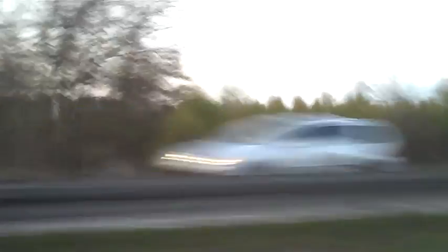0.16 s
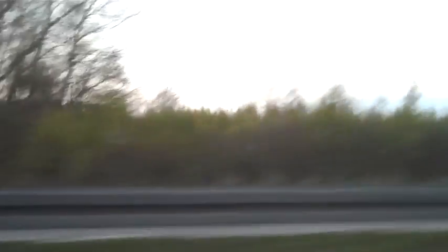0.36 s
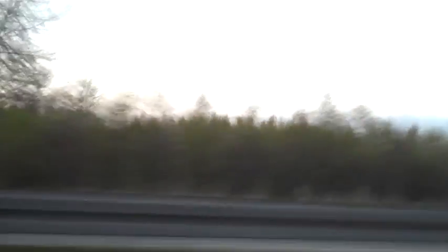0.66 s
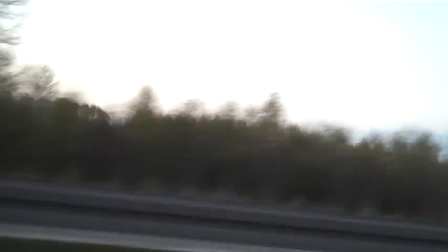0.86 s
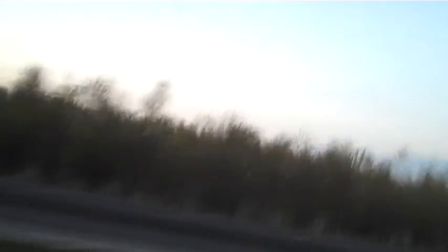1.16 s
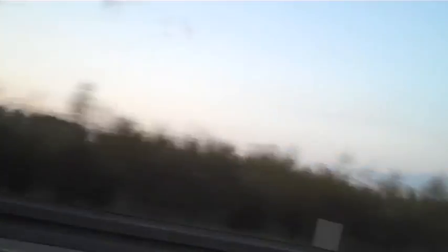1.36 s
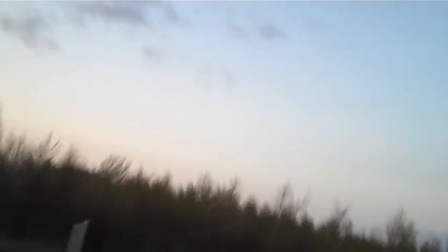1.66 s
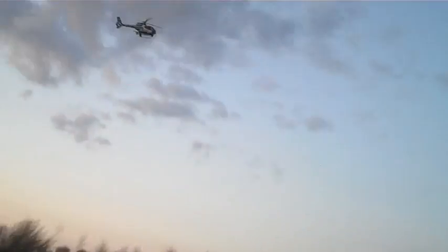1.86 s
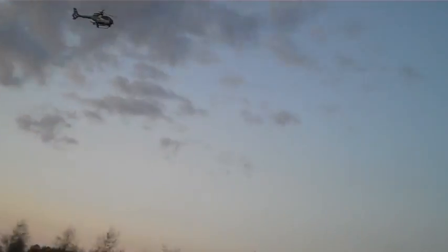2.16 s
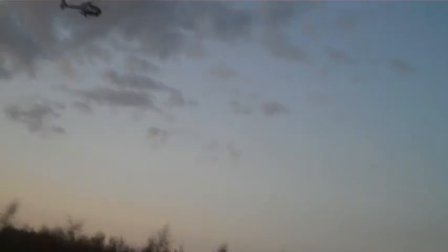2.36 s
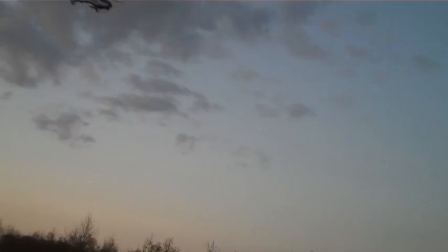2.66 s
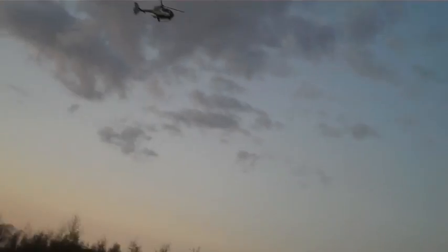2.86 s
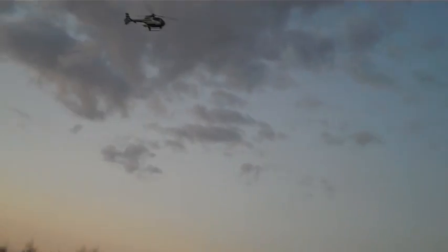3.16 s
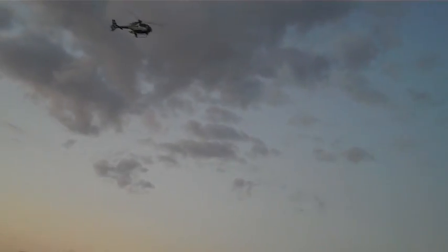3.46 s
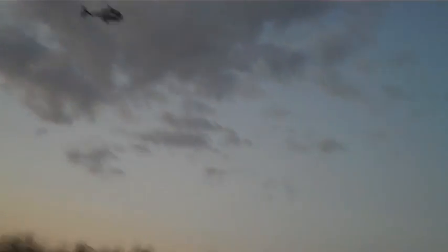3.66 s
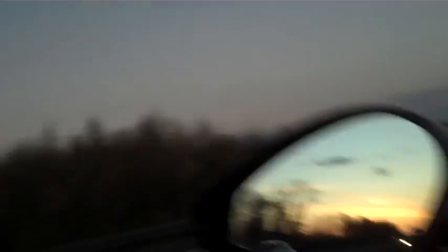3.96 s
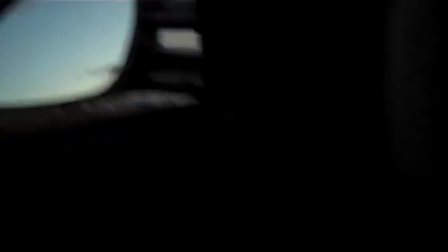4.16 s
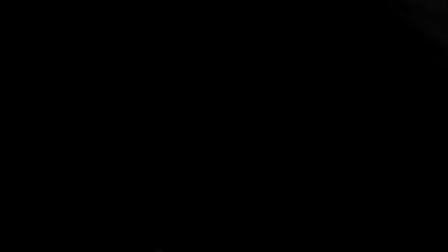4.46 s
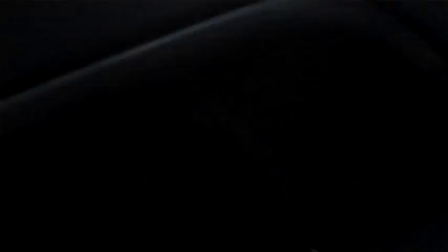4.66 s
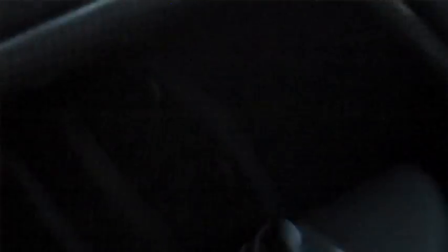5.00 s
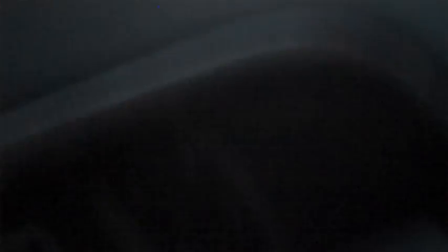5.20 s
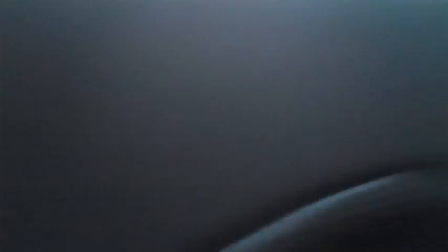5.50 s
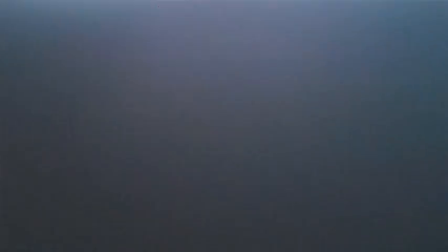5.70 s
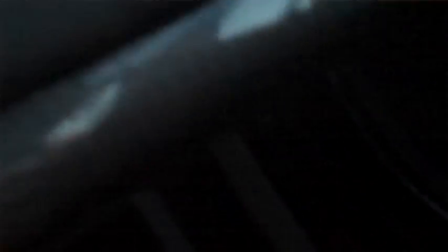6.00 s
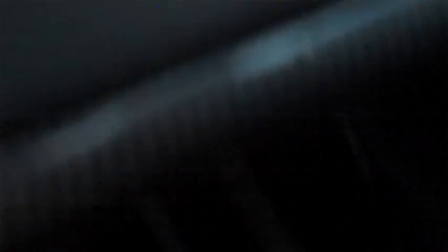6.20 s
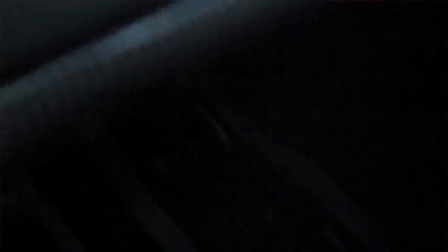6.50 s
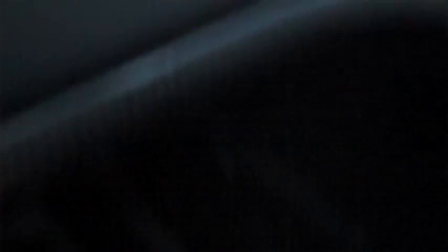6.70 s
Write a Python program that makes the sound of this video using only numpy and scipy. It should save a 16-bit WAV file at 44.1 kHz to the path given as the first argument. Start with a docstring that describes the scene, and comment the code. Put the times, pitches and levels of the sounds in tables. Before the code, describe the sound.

At the open window of a fast car, turbulent air slams the microphone with dense thumps, slaps and distorted crackles, easing into scattered pops and soft blows. At about four seconds the wind vanishes. Inside the cabin, a faint tyre wash remains, then a smooth six-cylinder engine swells, climbing in pitch and brightening steadily to the end.

```python
"""A microphone at the open window of a fast car: eddies slam into it as knots of pressure kinks that thump,
slap and crackle, tight vortices pop and knock, and shaped noise rumbles, flutters and hisses between them.
After four seconds the microphone is drawn inside and the buffeting stops, leaving a steady wash of tyre noise.
The six-cylinder engine then pulls up through its revs: sine lines on its cycle rate and pulsing, echoed noise
swell and brighten over the road. The loudest peaks flatten against the microphone's limit."""
import sys
import numpy as np
from scipy import signal
from scipy.fft import rfft, irfft, next_fast_len
from scipy.io import wavfile
from scipy.ndimage import uniform_filter1d

SR = 44100
rng = np.random.default_rng(int(sys.argv[2]) if len(sys.argv) > 2 else 0)


def transcribe(u):
    """Save the signal u as a 16-bit wav file named by the first command-line argument.

    u: samples, shape (n,) or (channels, n), limited to [-1, 1]; the rate is SR.
    q: integer samples, one column per channel.
    """
    v = np.clip(np.atleast_2d(u).T, -1, 1)
    q = np.round(v * 32767).astype(np.int16)
    wavfile.write(sys.argv[1], SR, q)


N = 301644
TIME = np.arange(N) / SR


def amp(db):
    """Decibels to gain."""
    return 10 ** (np.asarray(db) / 20)


def unit(x):
    """Scales to rms 1."""
    return x / np.sqrt(np.mean(x ** 2) + 1e-20)


def follow(rows):
    """Each column of a curve table, drawn as straight lines over the whole scene."""
    seconds, *columns = np.transpose(rows)
    return [np.interp(TIME, seconds, column) for column in columns]


def lift(hz, peaks):
    """The dB that resonances and hollows add at a frequency."""
    return sum(db / (1 + (2 * (hz - centre) / width) ** 2) for centre, width, db in peaks)


def colour(x, spectrum, peaks=()):
    """Filters x by a spectrum with resonances on top; rms 1."""
    size = next_fast_len(len(x))
    hz = np.fft.rfftfreq(size, 1 / SR)
    corner_hz, corner_db = np.transpose(spectrum)
    octaves = np.log2(hz + 1)
    corners = np.log2(corner_hz)
    # past either end of the spectrum the level falls 20 dB an octave
    outside = abs(octaves - np.clip(octaves, corners[0], corners[-1]))
    level = np.interp(octaves, corners, corner_db) - 20 * outside + lift(hz, peaks)
    filtered = irfft(rfft(x, size) * amp(level), size)
    return unit(filtered[:len(x)])


def noise():
    """White noise as long as the scene."""
    return rng.standard_normal(N)


def wander(rate_hz):
    """Smooth chance of rms 1, up to about the given rate."""
    hz = np.fft.rfftfreq(N, 1 / SR)
    return unit(irfft(rfft(noise()) * np.exp(-(hz / rate_hz) ** 2), N))


def scatter(shape):
    """Even chance between -1 and 1."""
    return rng.uniform(-1, 1, shape)


def swell(t, rise_s, fall_s):
    """A bell around t = 0 with its own rise and fall."""
    return np.exp(-.5 * (t / np.where(t < 0, rise_s, fall_s)) ** 2)


def add(mix, s, sound):
    """Adds a sound centred on the time s."""
    start = round(s * SR) - len(sound) // 2
    sound = sound[max(-start, 0):]
    part = mix[max(start, 0):][:len(sound)]
    part += sound[:len(part)]


# Strength of the airstream over the microphone. Each row: time in seconds, strength in dB.
AIRFLOW = [(0, -14.5), (.36, -21), (.85, -26), (1.35, -31), (2.1, -32.5), (2.95, -30.5), (3.4, -37),
           (3.9, -36)]
STREAM_DB = -30  # an ordinary airstream
# How much wind still reaches the microphone. Each row: time in seconds, gain in dB before each layer's own factor.
SHELTER = [(0, -3.5), (3.85, -2), (3.98, -5.5), (4.03, -19), (4.2, -32), (4.5, -62)]
# Surge and slack of the rumble. Each row: time in seconds, relative level in dB.
GUSTS = [(0.0, -26), (0.13, -24), (0.15, -16.5), (0.49, -29), (0.99, -23.5), (1.14, -31), (1.81, -27.5),
         (1.89, -39), (2.02, -23), (2.06, -29), (2.4, -28), (2.44, -30.5), (2.87, -25.5), (3.0, -30.5),
         (3.58, -29), (3.9, -33), (3.93, -42), (3.975, -24)]
# Tone of the wind's three layers. Each row: frequency in Hz, relative density in dB per Hz.
RUMBLE = [(15, -36), (30, -21), (60, -3.5), (100, 1.5), (150, -3.5), (220, -14.5), (320, -29), (600, -42)]
FLUTTER = [(100, -2), (220, 7.5), (400, -4), (700, -8.5), (1100, -13), (1800, -30), (2600, -36.5),
           (5000, -56.5)]
HISS = [(900, -1), (1800, 11.5), (2700, 5), (4000, -0.5), (7000, -10), (10000, -25.5), (14000, -34)]


def wind(rumble_db=4.5, flutter_db=-28.5, hiss_db=-58.5, lumps_db=2, flutter_depth_db=3.5, eddy_hz=45,
         hiss_growth=1.29, rumble_shelter=1.95, hiss_shelter=0.34, tearing=0.15):
    """Turbulent air rumbles, flutters and hisses; shelter stops the rumble first and the hiss last."""
    stream = follow(AIRFLOW)[0] - STREAM_DB
    shelter = follow(SHELTER)[0]
    eddies = wander(eddy_hz)

    low = colour(noise(), RUMBLE)
    low /= np.sqrt(uniform_filter1d(low ** 2, size=3500) + 1e-6)  # a steady stream feeds the rumble evenly
    lumpy = unit(low * amp(lumps_db * eddies))
    rumble = amp(rumble_db + follow(GUSTS)[0] + rumble_shelter * shelter) * lumpy

    fluttering = noise() * amp(flutter_depth_db * eddies)
    flutter = amp(flutter_db + stream + shelter) * colour(fluttering, FLUTTER)

    tear = tearing * np.maximum(stream, 0) * eddies  # a strong stream tears the hiss into shreds
    hiss_level = hiss_db + hiss_growth * stream + tear + hiss_shelter * shelter
    return rumble + flutter + amp(hiss_level) * colour(noise(), HISS)


# Tone of the tyres. Each row: frequency in Hz, relative density in dB per Hz.
TYRES = [(25, 4), (110, -12.5), (300, -24), (430, 0), (700, 1), (950, -2), (1200, -10), (1550, -2.5),
         (1950, -9.5), (2200, -16), (4000, -23.5), (8000, -36)]


def road(tyres_db=-52):
    """The steady wash of the tyres: noise through a fixed spectrum."""
    return amp(tyres_db) * colour(noise(), TYRES)


OUTSIDE_S = 3.85  # chance eddies reach the microphone until then


def shedding(count):
    """Times at which the window edge sheds eddies: one somewhere in each equal stretch."""
    return (np.arange(count) + rng.random(count)) * OUTSIDE_S / count


def small_eddies(thump_db=-27, slap_db=-31, crackle_db=-50, growth=0.96, spread_db=3,
                 length_s=0.0052, spread_octaves=0.3, count=40):
    """Weaker eddies arrive by chance, harder in a stronger stream: rows like those of BUFFETS."""
    times = shedding(count)
    size, stretch = scatter((count, 2)).T
    stream = np.interp(times, *np.transpose(AIRFLOW)) - STREAM_DB
    force = growth * stream + spread_db * size  # dB
    lengths = length_s * 2 ** (spread_octaves * stretch)
    return list(zip(times, lengths, thump_db + force, slap_db + force, crackle_db + force))


# Turbulent eddies that hit the microphone. Each row: centre in seconds, length scale in seconds,
# then thump, slap and crackle in dB.
BUFFETS = [(0.0026, 0.0058, -17, -5, -24), (0.0235, 0.0077, -4.5, -6, -25),
           (0.0625, 0.0037, 0.5, -7.5, -21), (0.0809, 0.0045, -13, -31, -47),
           (0.0933, 0.0032, -7, -14, -46), (0.1164, 0.012, -23, -27, -56), (0.1568, 0.0059, -9, -27, -52),
           (0.1795, 0.0071, -10, -11.5, -25), (0.206, 0.014, -10.5, -13, -34),
           (0.2354, 0.0057, -20, -17, -36), (0.277, 0.0039, -15, -13.5, -32),
           (0.3142, 0.013, -10, -24, -40), (0.3271, 0.016, -12.5, -17, -25),
           (0.3845, 0.0086, -13.5, -13, -32), (0.4084, 0.0047, -19, -15, -30),
           (0.4274, 0.009, -10, -15, -26.5), (0.461, 0.0071, -11, -12.5, -26),
           (0.4691, 0.0042, -17.5, -13, -29), (0.4892, 0.0056, -22, -19, -44),
           (0.5436, 0.004, -2.5, -10.5, -20), (0.5534, 0.0095, -13, -10.5, -33),
           (0.5687, 0.0095, -7, -16, -28.5), (0.5974, 0.0096, -11, -30, -37),
           (0.6224, 0.0071, -13, -24, -33), (0.6311, 0.0089, -14, -22, -31.5),
           (0.6485, 0.012, -18, -30.5, -50), (0.6885, 0.0096, -12.5, -16.5, -27),
           (0.7816, 0.0043, -13, -11.5, -31), (0.7955, 0.0029, -16, -27, -35), (0.806, 0.004, -8, -27, -33),
           (0.8251, 0.0064, -15.5, -17.5, -30), (0.852, 0.015, -17.5, -30, -41),
           (0.896, 0.0056, -20, -36, -40), (0.9301, 0.0056, -22, -26.5, -56),
           (0.9793, 0.0047, -17, -15.5, -34.5), (1.001, 0.0088, -15, -19.5, -35),
           (1.0127, 0.0022, -11, -17, -28), (1.0395, 0.0031, -15, -21, -42),
           (1.0632, 0.0093, -19.5, -18.5, -32.5), (1.0768, 0.0026, -30.5, -26, -46),
           (1.0934, 0.012, -14, -23, -36), (1.1224, 0.01, -25, -19.5, -49), (1.1458, 0.0075, -16, -19, -37),
           (1.1685, 0.006, -15, -24, -46), (1.1813, 0.004, -11.5, -21, -32),
           (1.2066, 0.0024, -24, -16, -28), (1.2123, 0.005, -15, -18, -34),
           (1.2279, 0.011, -22, -21.5, -37), (1.2472, 0.0052, -16.5, -25, -33.5),
           (1.2717, 0.014, -22, -25, -40), (1.2928, 0.0037, -13.5, -23, -43),
           (1.3067, 0.0074, -12, -26, -31), (1.3166, 0.0022, -20, -20, -24), (1.3234, 0.004, -14, -19, -36),
           (1.3706, 0.0094, -20.5, -31, -45), (1.395, 0.0025, -20, -22.5, -36.5),
           (1.4563, 0.011, -18, -28, -41.5), (1.4712, 0.0085, -20.5, -28, -43),
           (1.4975, 0.0082, -16, -15.5, -38.5), (1.5085, 0.0065, -20, -31, -40),
           (1.5481, 0.0082, -19.5, -24, -45), (1.5843, 0.012, -18, -25, -39.5),
           (1.6196, 0.0087, -24, -19.5, -32.5), (1.6445, 0.018, -17, -23, -41),
           (1.6835, 0.0056, -21.5, -33, -46.5), (1.7024, 0.0024, -18.5, -35, -48),
           (1.7455, 0.011, -18.5, -26, -43.5), (1.7967, 0.0095, -21, -33, -57.5),
           (1.8241, 0.008, -30, -27.5, -43), (1.859, 0.0094, -18, -23, -38),
           (1.8759, 0.0055, -12.5, -12, -28), (1.915, 0.012, -21, -28.5, -45),
           (1.9549, 0.0058, -22, -35, -59), (2.0275, 0.0019, -17, -18, -47),
           (2.0645, 0.011, -23.5, -34, -57), (2.1558, 0.0099, -25.5, -41, -47),
           (2.2226, 0.0032, -19.5, -26, -40), (2.4253, 0.0038, -15.5, -33, -55),
           (2.4585, 0.0096, -31, -39, -43), (2.5853, 0.0077, -17, -25.5, -42.5),
           (2.6349, 0.011, -17, -25, -39), (2.7374, 0.0026, -14, -36, -48),
           (2.8368, 0.0023, -8.5, -17.5, -24.5), (2.8423, 0.0069, -14, -31, -32.5),
           (2.9163, 0.011, -18, -24, -38), (3.1535, 0.0085, -19.5, -29, -41.5),
           (3.3233, 0.0031, -22, -27, -49), (3.5681, 0.01, -23.5, -29.5, -60),
           (3.599, 0.0059, -20, -32, -48), (3.6265, 0.008, -19, -37, -62), (3.695, 0.0068, -30, -31, -61),
           (3.7852, 0.0042, -27, -24.5, -27.5), (3.8396, 0.0024, -33, -18, -37.5)]
# Tone of a buffet's three parts. Each row: frequency in Hz, relative density in dB per Hz.
THUMP = [(70, -19), (130, -0.5), (190, 1), (280, 1.5), (370, -1), (470, -9), (600, -15.5), (1000, -44.5)]
SLAP = [(280, -2), (450, 6.5), (600, 1), (900, -8), (1400, -25), (2200, -43), (3500, -48.5), (6000, -73)]
CRACKLE = [(900, 8.5), (1700, 5.5), (2600, -2.5), (4000, -7.5), (6500, -12), (9500, -23.5), (14000, -35.5)]


def buffets(kinks_per_s=900, fizz=0.056, rise=0.49, fall=0.48, thump_spread=0.58, sharpness=1.02):
    """Each eddy is a knot of sudden pressure kinks; the same kinks make its thump, slap and crackle."""
    out, t = np.zeros(N), np.arange(-2048, 2048) / SR
    for s, length, thump_db, slap_db, crackle_db in list(BUFFETS) + small_eddies():
        chance = rng.random(len(t))
        height, spray = rng.standard_normal((2, len(t)))
        kinks = height * (chance < kinks_per_s / SR)
        kinks[len(t) // 2] = 1.75 * np.sign(height[0])  # the core of the eddy
        snaps = np.sign(kinks) * abs(kinks) ** sharpness  # tall kinks crackle a touch more
        core = swell(t, rise * length, fall * length)
        skirt = swell(t, thump_spread * length, thump_spread * length)
        wake = .09 * swell(t, .004, .012)  # a weak, ragged trail
        # no two eddies have quite the same colour, and each slap rings at a pitch of its own
        tint = [(hz, hz / 2, 3 * rng.standard_normal()) for hz in np.geomspace(2000, 11000, 5)]
        ring = (rng.uniform(400, 1200), 220, 4)

        push = amp(thump_db) * colour(kinks * skirt, THUMP)
        slope = np.gradient(kinks * core)  # the slap follows the pressure slope
        push += amp(slap_db) * colour(slope, SLAP, [ring])
        push += amp(crackle_db) * colour((snaps + fizz * spray) * (core + wake), CRACKLE, tint)
        add(out, s, push * np.sqrt(length * SR / len(t)))  # a longer eddy carries more energy
    return out


# Tight vortices that pop as one spike of pressure; a quick rise is a sharp pop.
# Each row: peak time in seconds, rise in seconds, level in dB.
POPS = [(0.037, 0.00037, 2), (0.129, 0.00067, -8), (0.2572, 0.00018, 2), (0.363, 0.00085, 0),
        (0.4756, 0.00034, -3), (0.565, 0.00056, -15), (0.599, 0.00042, -6), (0.6943, 0.0005, -5),
        (0.8437, 0.00026, -1), (0.9856, 0.0004, 0.5), (1.091, 0.00016, -2.5), (1.2144, 0.00012, -2),
        (1.2742, 0.00011, 1), (1.4955, 0.0001, -11), (2.2395, 0.00023, -2.5), (2.2649, 0.00015, -2),
        (2.3003, 0.00021, -5), (2.675, 0.00033, -6.0), (2.6881, 0.00019, -6), (2.7636, 0.0019, -10.5),
        (2.859, 0.00013, 0), (2.8668, 0.00028, -9), (2.8757, 0.00026, -9), (3.0287, 0.00013, -2),
        (3.0613, 0.00033, -1), (3.0961, 0.00016, 0), (3.1149, 0.0003, -2.5), (3.1368, 0.00028, -8),
        (3.2072, 0.000095, -7), (3.2513, 0.0002, -5.5), (3.2711, 0.00016, -7.5), (3.2906, 0.00039, -6),
        (3.3495, 0.00024, -9), (3.4223, 0.00046, -5.5), (3.426, 0.00028, -5), (3.4964, 0.00016, -5.5),
        (3.5086, 0.00014, -4), (3.6707, 0.00015, -7.5), (3.7502, 0.00032, -8), (3.7841, 0.000069, -5)]


def pops(fall_s=0.00055, lead=0.15, lead_s=0.00076, rebound_s=0.0012, suction_s=0.0036,
         fizz_db=-43, fizz_s=0.0014, round_hz=7000, tint_db=3):
    """Pressure dips, builds, snaps up in a cusp and rebounds below rest; a short fizz rides on the peak."""
    out, t = np.zeros(N), np.arange(-512, 512) / SR
    hz = np.fft.rfftfreq(len(t), 1 / SR)
    for s, rise_s, db in POPS:
        cusp = np.exp(-np.where(t < 0, abs(t / rise_s), abs(t / fall_s) ** 1.37))
        push = 0.78 * cusp + lead * swell(t, lead_s, fall_s / 2)
        lag = 1 + 0.11 * scatter(2)
        rebound = swell(t - rebound_s * lag[0], 0.00062, 0.0011)
        suction = .5 * swell(t + suction_s * lag[1], 0.00046, 0.00069)
        dip = rebound + suction
        pressure = push - dip * push.sum() / dip.sum()  # push and dip balance to zero

        fizz = colour(rng.standard_normal(len(t)) * swell(t, fizz_s / 2, fizz_s), CRACKLE)
        tint = [(centre, centre / 2, tint_db * scatter(1)[0]) for centre in np.geomspace(400, 9000, 7)]
        shade = amp(lift(hz, tint)) / (1 + (hz / round_hz) ** 4)  # own colour and a rounded tip
        pop = irfft(rfft(pressure) * shade)
        add(out, s, amp(db) * (pop + amp(fizz_db) * fizz))
    return out


# Slow vortices that shove the microphone at set times. Each row: centre in seconds, relative level in dB.
SHOVES = [(.382, -15), (.803, -9), (1.01, -11), (2.242, -12), (2.672, -14), (2.765, -12), (2.829, -13),
          (2.98, -12.5), (3.11, -11.5), (3.593, -15.5), (3.728, -12), (3.893, -17.5), (3.972, -27)]
# Tone of a shove. Each row: frequency in Hz, relative density in dB per Hz.
SHOVE = [(20, -20), (40, -29), (70, -18), (110, -2.5), (150, 1), (210, -11), (350, -64.5)]


def shoves(length_s=0.016, rise_s=0.0022, fall_s=0.003, shove_db=-7.0, chance_db=-21, spread_db=3, count=30):
    """Large vortices pass as soft, deep blows without any crackle; others come by chance."""
    out, t = np.zeros(N), np.arange(-4096, 4096) / SR
    by_chance = zip(shedding(count), chance_db + spread_db * scatter(count))
    for s, db in list(SHOVES) + list(by_chance):
        blow = colour(rng.standard_normal(len(t)) * swell(t, rise_s, fall_s), SHOVE)
        add(out, s, amp(db + shove_db) * blow * np.sqrt(length_s * SR / len(t)))
    return out


# Vortices that spin on the microphone and knock.
# Each row: centre in seconds, pitch in Hz, bell width to either side in seconds, peak in dB.
WHIRLS = [(0.55, 240, 0.0054, -9), (1.876, 515, 0.0039, -13.5), (3.7842, 415, 0.0025, -10.5)]


def whirls():
    """A spinning vortex beats on the microphone for a few turns: a short, pitched knock."""
    out, t = np.zeros(N), np.arange(-2048, 2048) / SR
    for s, hz, width_s, db in WHIRLS:
        turns = np.sin(2 * np.pi * (hz * t + rng.random()))
        add(out, s, amp(db) * swell(t, width_s, width_s) * turns)
    return out


# Engine speed. Each row: time in seconds, four-stroke cycles a second.
SPEED = [(3.9, 33.7), (4.55, 34.12), (5, 35.65), (5.5, 37.65), (6, 39.75), (6.4, 41.32), (6.84, 43.15)]
# Bands of the intake's howl. Each row: centre in Hz, half width in Hz, level in dB against the load,
# cycle rate it favours in Hz, gain there in dB.
HOWLS = [(392, 55, -18.5, 35.8, 12.5), (477, 37, -17.5, 39.5, 10.5), (588, 70, -15.5, 39.7, 10),
         (831, 110, -15.5, 39, 4.5), (1200, 450, -11.5, 59, 16)]


def howl(span_hz=0.87):
    """The intake's broad resonances: noise bands, each louder as the revs near the speed it favours."""
    speed, sound = follow(SPEED)[0], np.zeros(N)
    for hz, half, db, best_speed, gain_db in HOWLS:
        band = [(hz - half, -20), (hz, 0), (hz + half, -20)]
        level = db + lift(speed, [(best_speed, span_hz, gain_db)])
        sound += amp(level) * colour(noise(), band)
    return sound


def reflect(x):
    """Glass and trim echo the sound; their delays drift as the microphone moves, so bands shift through it."""
    echoes = []
    for delay_s in (.0091, .0137, .0193):
        drift_s = 2e-4 * wander(.8)
        echoes.append(.22 * np.interp(TIME - delay_s - drift_s, TIME, x))
    return unit(x + sum(echoes))


# Engine load, the level that the engine's layers follow. Each row: time in seconds, load in dB.
LOAD = [(4.15, -55), (4.5, -49.5), (4.8, -41), (5.5, -27.5), (5.8, -25), (6.5, -22)]
IDLE_DB, FULL_DB = -54.5, -13  # the load with the throttle shut and wide open
# Exhaust lines; 6 is the firing note.
# Each row: multiple of the cycle rate, relative dB at light load, relative dB at full load.
ORDERS = [(3, -2.5, -31.5), (6, -10, -17), (9, -12, -2), (12, -2.5, -19.5), (13, -10, -22),
          (14, -7.5, -15.5), (15, -0.5, -27), (18, -7, -28)]
# Standing waves of the cabin that the exhaust notes climb through; negative ones are hollows.
# Each row: frequency in Hz, width in Hz, gain in dB.
STANDING = [(210.5, 12, 17.5), (208.6, 5, -10), (237.2, 30, 12.5), (329, 23, 4), (356.5, 20, -11.5),
            (564, 9.6, 7), (770, 47, 10)]
# Resonances and hollows of the intake and cabin. Each row: frequency in Hz, width in Hz, gain in dB.
CABIN = [(824, 40, 3), (1215, 70, 3), (1640, 70, -3), (985, 25, -6), (1055, 25, 5), (1390, 50, -5),
         (1467, 14, 5), (1812, 20, 6), (2075, 60, 3), (2525, 50, -6), (2902, 30, 6), (2998, 30, 5),
         (3845, 70, 3)]
# Tone of the engine's noise layers. Each row: frequency in Hz, relative density in dB per Hz.
BOOM = [(15, -13), (45, -9.5), (75, -1.5), (115, 0.5), (170, 6.5), (230, 2.5), (330, -1.5), (600, -40)]
ROAR = [(150, -20.5), (300, -6), (410, -1.5), (510, 1), (690, -5), (850, -2), (1000, -2), (1250, -17),
        (1400, -9.5), (1900, -14), (2500, -31), (3550, -26.5), (3900, -36.5)]
RASP = [(600, -32), (1100, 14), (1500, 10), (2100, 7.5), (2550, 6.5), (3550, -5.5), (4200, -18)]
RUSH = [(2200, -7), (3400, 3), (3950, 0), (5200, -2), (7000, -4), (9000, -9), (11500, -16), (14000, -23.5)]


def engine(lines_db=-1.5, roar_db=-2.5, rasp_db=-12.5, rush_db=-24.0, boom_db=-31.0, throb=0.059,
           boom_growth=0.49, rasp_from_hz=38.02, rasp_db_per_hz=2.0, rush_db_per_hz=2.5):
    """Exhaust lines on the cycle rate, and rushing gas that pulses with each firing and rings the cabin."""
    load, speed = follow(LOAD)[0], follow(SPEED)[0]
    throttle = (load - IDLE_DB) / (FULL_DB - IDLE_DB)
    cycles = np.cumsum(speed * (1 + .0003 * wander(6))) / SR
    sound = np.zeros(N)
    # each line wavers a little and swells or sinks as it crosses a standing wave
    for multiple, light_db, full_db in ORDERS:
        order = round(multiple)
        balance = light_db + (full_db - light_db) * throttle
        level = load + lines_db + balance + lift(order * speed, STANDING) + .35 * wander(4)
        sound += amp(level) * np.sqrt(2) * np.sin(2 * np.pi * (order * cycles + rng.random()))

    sound += amp(boom_db + boom_growth * (load - FULL_DB)) * colour(noise(), BOOM)
    sound += amp(load) * howl()

    pulsing = 1 + throb * np.cos(2 * np.pi * 6 * cycles)  # six firings a cycle
    strain = np.maximum(speed - rasp_from_hz, 0)  # at high revs rasp outgrows roar, and rush grows faster still
    roar_level = load + roar_db
    rasp_level = load + rasp_db + rasp_db_per_hz * strain
    rush_level = load + rush_db + rush_db_per_hz * strain
    for level, spectrum in ((roar_level, ROAR), (rasp_level, RASP), (rush_level, RUSH)):
        sound += amp(level) * reflect(colour(noise() * pulsing, spectrum, CABIN))
    return sound


def scene():
    """Wind at the window, then the engine in the cabin, over the road."""
    outside = wind() + buffets() + pops() + shoves() + whirls()
    return (outside + road() + engine())[None]


def record(dry, ceiling=0.72, edge_hz=13900):
    """The strongest peaks flatten against the microphone's limit; then a low-pass sets the band limit."""
    clipped = dry / (1 + (dry / ceiling) ** 8) ** (1 / 8)
    lowpass = signal.firwin(401, edge_hz, window=("kaiser", 8), fs=SR)
    return signal.oaconvolve(clipped, lowpass[None], "same")


dry = scene()
out = record(dry)
transcribe(out)
```